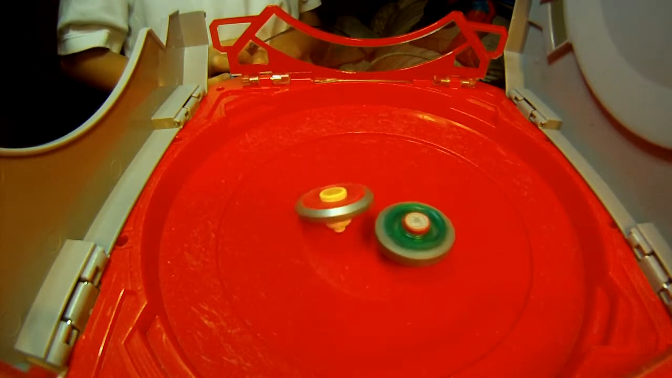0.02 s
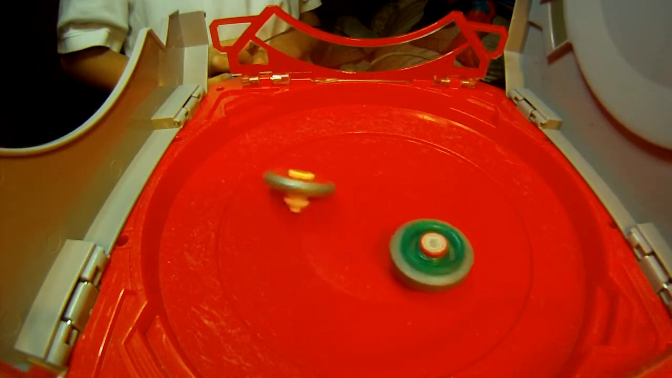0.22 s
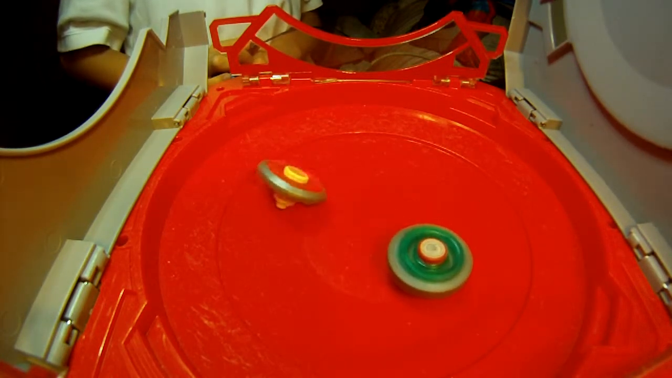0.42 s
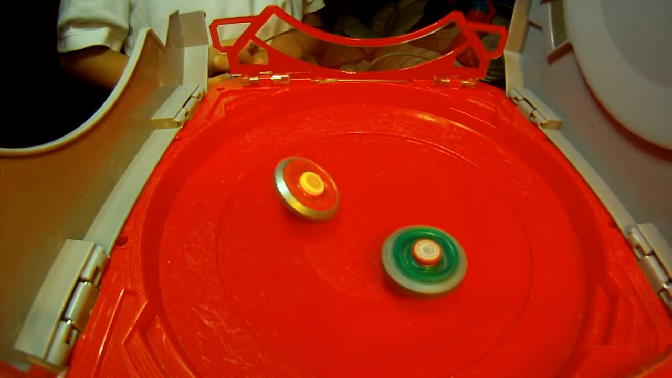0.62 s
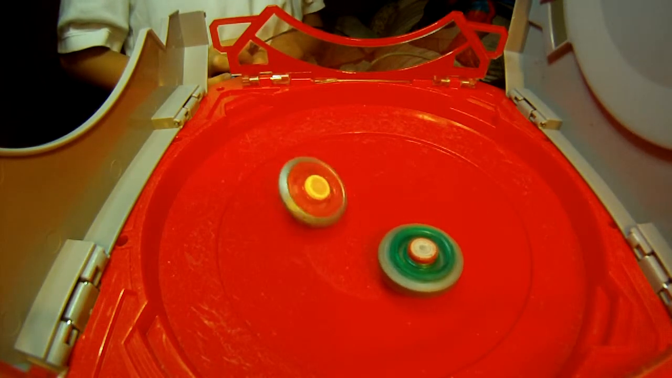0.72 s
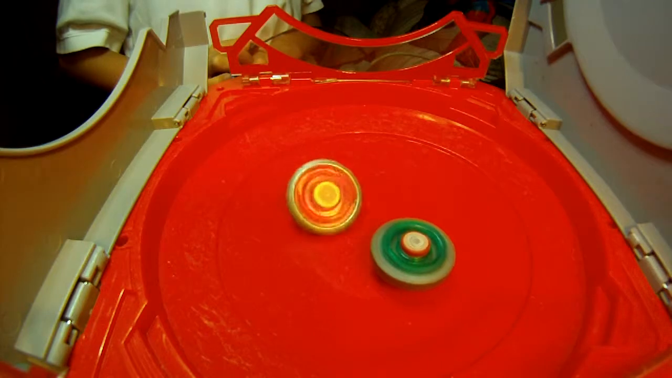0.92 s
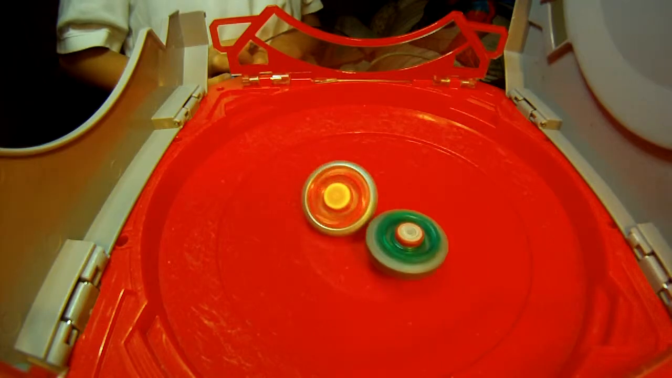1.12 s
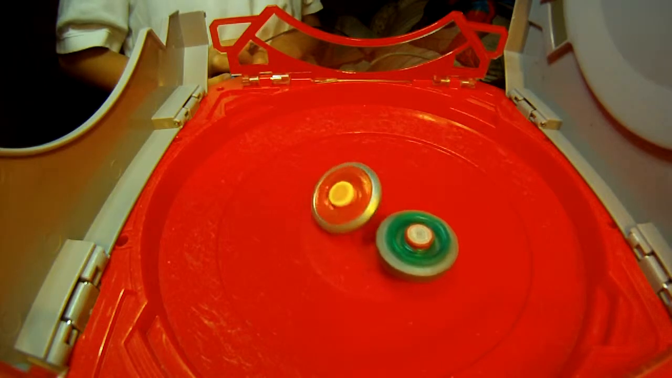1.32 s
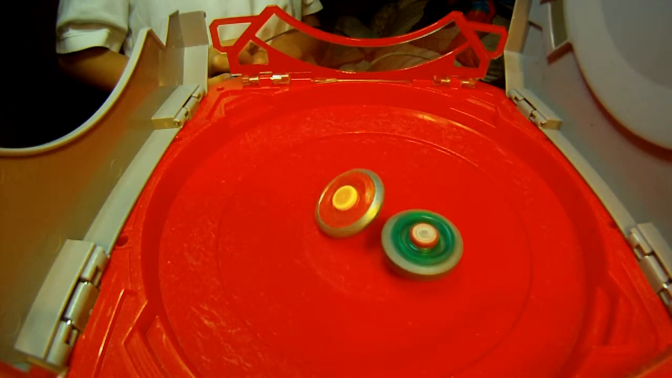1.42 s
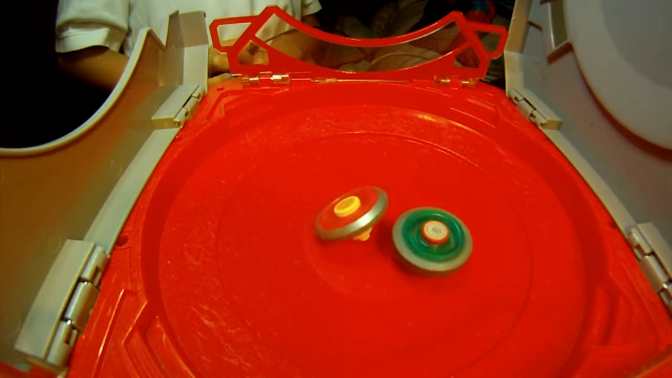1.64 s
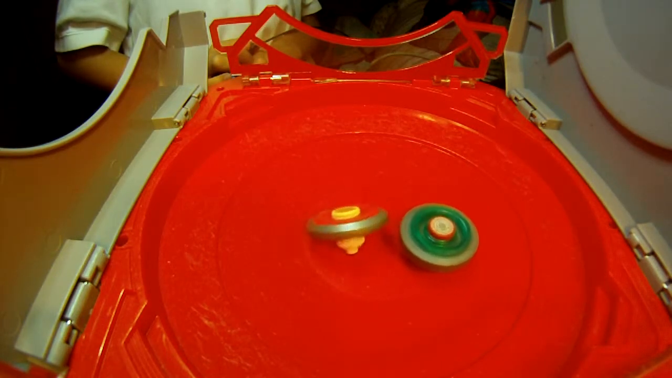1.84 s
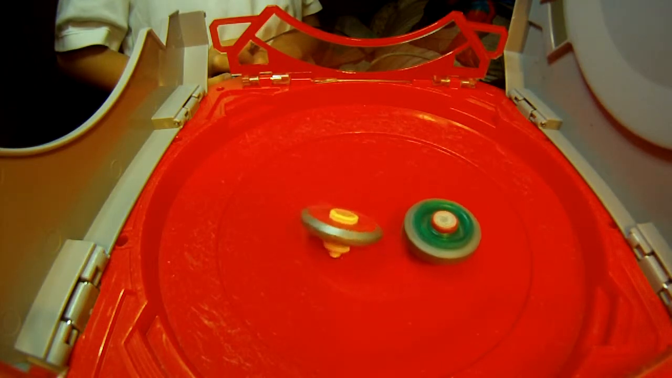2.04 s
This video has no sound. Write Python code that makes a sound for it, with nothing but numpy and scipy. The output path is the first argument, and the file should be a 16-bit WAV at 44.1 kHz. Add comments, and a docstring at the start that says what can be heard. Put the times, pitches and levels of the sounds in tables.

```python
"""A soft hiss and a rubbing hum come first: two metal-wheeled tops spin in a plastic stadium.
Twice their wheels clash brightly, and one top hops over the floor with thumps and clacks until it settles.
The leaning top's tip rubs and knocks once a turn, which makes the floor hum; the other top only hisses.
Noise shaped in colour and level makes the rubs and cracks; fading sine waves make the ringing parts.
A small camera close by overloads on the hardest knock and holds its samples at a low rate: a gritty treble."""
import sys
import numpy as np
from scipy import signal
from scipy.fft import rfft, irfft, next_fast_len
from scipy.io import wavfile

SR = 44100
rng = np.random.default_rng(int(sys.argv[2]) if len(sys.argv) > 2 else 0)


def to_wav(sig):
    """Store sig (one row per channel, or 1-D mono) as 16-bit WAV at the path in sys.argv[1].

    Samples outside -1..1 are clipped; the rate is SR.
    """
    pcm = np.clip(np.atleast_2d(sig), -1, 1) * 32767
    pcm = np.round(pcm).astype(np.int16)
    wavfile.write(sys.argv[1], SR, pcm.T)  # frames by channels


N = 92610  # samples in the scene
T = np.arange(N) / SR  # time [s]
SIZE = next_fast_len(N + SR // 2)  # filter length with spare room [samples]
HZ = np.fft.rfftfreq(SIZE, 1 / SR)  # frequencies of the filters [Hz]
AGE = T[:SR * 3 // 4]  # time since a blow [s]

# How fast the leaning top spins: (time [s], speed [turns/s])
SPIN = [(0, 28.5), (.5, 27.4), (1.2, 27.25), (1.45, 26.85), (2.1, 26.8)]
# The leaning top on the floor: (time [s], hum [dB], rub [dB], once-a-turn tick [dB])
CONTACT = [(0, -64, -50, -86), (.19, -48.5, -48.5, -64), (.27, -45, -55, -62), (.4, -40, -37.5, -72),
           (.5, -42.5, -44.5, -68.5), (.62, -52, -48.5, -78), (.75, -47, -49.5, -60), (.9, -41, -47, -50),
           (1.02, -46.5, -43, -48), (1.1, -38.5, -42.5, -43.5), (1.22, -45, -42.5, -47.5),
           (1.42, -46.5, -53.5, -57), (1.62, -50, -46.5, -58.5), (1.77, -55, -49.5, -43.5),
           (1.9, -51.5, -45.5, -42), (2.1, -50, -43, -53.5)]
# Its distance from the middle of the floor: (time [s], distance [0-1])
OUTWARD = [(0, 0.44), (.2, 0.4), (.4, 0.87), (.65, 0.82), (.9, 0.85), (1.18, 0.58), (1.45, 0.09),
           (2.1, 0.25)]
# Colour of the rub far out and in the middle: (frequency [Hz], level [dB])
RUB_OUT = [(60, -32.5), (150, -22.5), (230, -1), (335, -1), (430, -4.5), (510, -3.5), (580, -17),
           (680, -27.5), (1300, -30.5), (5000, -43.5)]
RUB_MIDDLE = [(60, -15), (130, -3), (290, -13), (400, -0.5), (500, -0.5), (600, 1), (665, -15.5),
              (930, -17), (1400, -28.5), (5000, -54)]
# Colour of a tick, scuff or graze: (frequency [Hz], level [dB])
TICK_COLOUR = [(60, -20), (130, -7), (300, -3), (450, 4), (590, 6), (720, -10), (920, -5), (1300, -13),
               (1800, -27), (3000, -25), (5500, -50)]
# Hiss of the sliding tips: (time [s], level [dB])
SLIDE = [(0, -54), (.5, -56), (.7, -58), (1.2, -58.5), (1.65, -58), (1.8, -52.5), (1.89, -46.5),
         (1.93, -55), (2.1, -56)]
# Colours of the hiss and the quiet room: (frequency [Hz], level [dB])
HISS_COLOUR = [(200, 23.5), (900, 4), (1800, 2), (2500, 6.5), (3200, 6), (3900, -2), (5000, -1.5),
               (5900, -21)]
ROOM_COLOUR = [(20, -13), (60, 0.5), (120, 0), (200, 2.5), (500, -3.5), (1200, -32), (5000, -28.5)]
# Wheel against wheel: (time [s], crack level [dB], ring of the wheels before WHEEL_DB [dB re crack])
CLASHES = [(.198, -23, 1), (0.2136, -14, -0.5), (0.2173, -30, -34), (0.2302, -31, -20), (1.2608, -15, 0.5),
           (1.272, -29, -9)]
# Colour of the crack: (frequency [Hz], level [dB])
CLINK_COLOUR = [(200, -58), (900, -28.5), (1450, -8.5), (1900, -12.5), (2600, -1.5), (3250, 3), (4100, -2),
                (4850, 1.5), (5350, -14.5), (5900, -10)]
# Ringing tones of the steel wheels: (frequency [Hz], level [dB], time to fade by 60 dB [s])
WHEELS = [(2850, 6, 0.13), (2920, -4, 0.24), (2960, 4, 0.29), (3240, 0, .22), (3410, 16.5, 0.017),
          (3866, 5, 0.15), (3980, -9, 0.73), (4350, -15, 0.83), (4320, -10.5, 0.75), (4540, 14, 0.049),
          (5170, 4.5, 0.15), (5700, 2.5, 0.23)]
# A top lands on the floor: (time [s], thump [dB], plastic clack [dB])
LANDINGS = [(0.199, -15, -32), (0.2069, -12.5, -22.5), (0.2145, -16.5, -21), (.218, -8, -20.5),
            (0.2324, -17.5, -55), (0.2426, 1, -27), (0.2706, -12, -26), (.2855, -16, -58),
            (0.2934, -21, -29), (0.2978, -13.5, -27.5), (0.3109, -12, -25), (.3277, -8, -19.5),
            (.336, -17, -27.5), (0.3512, -8, -27), (0.3661, -12.5, -29), (0.3789, -14, -28),
            (.3895, -12.5, -32), (.398, -23, -33), (1.261, -20, -28), (1.271, -11, -14.5),
            (1.277, -24, -26.5), (1.2973, -2.5, -18), (1.31, -17, -61), (1.3238, -12.5, -25.5),
            (1.333, -17, -35), (1.338, -15.5, -52), (1.345, -19.5, -46), (1.576, -27, -49),
            (2.02, -45, -50)]
# Colours of the thump, the clack and the hollow under the floor: (frequency [Hz], level [dB])
THUMP_COLOUR = [(25, -31.5), (70, -27.5), (120, -15.5), (190, -23.5), (290, -8.5), (400, -4.5), (500, 3),
                (590, -2), (720, -26.5), (1000, -41.5), (1500, -37.5), (2200, -73.5), (5000, -78)]
CLACK_COLOUR = [(100, -70), (500, 12), (850, 9.5), (1400, -4), (1900, -3), (2700, 4), (3300, -2),
                (4200, -10.5), (5800, -13)]
BOOM_COLOUR = [(30, -34), (70, -17), (115, 3), (165, -8), (260, -4.5), (400, -14), (1500, -65)]
# Ringing tones of the plastic shell and the stadium: (frequency [Hz], level [dB], time to fade by 60 dB [s])
SHELL = [(1530, -0.5, 0.024), (2970, -3, 0.027), (3730, -6, 0.022)]
STADIUM = [(116.4, -7.5, 0.44), (198, -17.5, 0.64), (250, -20, 0.12), (258.2, -0.5, 0.42),
           (319.4, -16.5, 0.46), (389.7, 1, 0.26), (469.6, 7.5, 0.3), (563, -5.5, 0.39), (589, -10, 0.39),
           (850, -11, 0.24)]
# The top grazes the floor: (time [s], level [dB])
GRAZES = [(1.581, -34), (2.027, -38)]

# Levels in dB, widths and lags in turns, fading times (T60, to fall by 60 dB) in seconds
TICK_AT_S = 1.768  # one whole turn ends here; all other turns are counted from it
HUM_MIDDLE_HZ, HUM_OUT_HZ, HUM_LAG, HUM_WIDTH = 203, 254, 0.5817, 0.22
NOTE_HZ, NOTE_LAG, NOTE_WIDTH, NOTE_DB = 591, 0.029, 0.12, -5  # the floor's higher note
NOTE_SAG_HZ = 190  # how much that note falls far from the middle
DRONE_DB = 2.5  # compared with the rub
TAP_DB, TAP_SCATTER_DB = -2, 1.2
SCUFF_DB, SCUFF_WIDTH = 1, 0.07
ROOM_DB = -57.5
CLINK_T60, CLINK_TAIL_DB, CLINK_TAIL_T60, WHEEL_DB = 0.039, -28, 0.42, -29
CLACK_T60, CLACK_TAIL_DB, CLACK_TAIL_T60 = 0.027, -19, 0.33
THUMP_LAG_S, STADIUM_DB = 0.00081, -27
BOOM_DB, BOOM_T60 = -31.5, 0.4  # level compared with the thump
SHELL_DB, SHELL_GROWS = -20.5, 2.3  # ring at a 0 dB thump; dB of ring for each dB of thump
GRAZE_WIDTH_S = 0.0055
LOW_CUT_HZ, ANTI_ALIAS_HZ, HOLD_HZ, TOP_HZ = 28, 5800, 12000, 15450
CLIP_TOP = 1.0  # largest sample before overload


def amp(db):
    """Turn decibels into a plain multiplier."""
    return 10 ** (np.asarray(db) / 20)


def unit(x):
    """Scale a sound to an average strength (rms) of 1."""
    return x / np.sqrt(np.mean(x ** 2) + 1e-20)


def curves(rows):
    """Draw one value per sample, in straight lines between rows, for each column after the time."""
    times, *columns = np.transpose(rows)
    return [np.interp(T, times, column) for column in columns]


def filtered(x, response):
    """Multiply the spectrum of x by a response on the HZ grid."""
    return irfft(rfft(x, SIZE) * response, SIZE)[:len(x)]


def coloured(x, points):
    """Give x the listed colour with a filter that never acts ahead of the sound."""
    hz, db = np.transpose(points)
    level_db = np.interp(np.log(HZ + 1), np.log(hz), db)
    # Folding the log spectrum's transform onto positive times makes the filter minimum-phase
    cepstrum = irfft(np.log(amp(level_db)), SIZE)
    cepstrum[1:SIZE // 2] *= 2
    cepstrum[SIZE // 2 + 1:] = 0
    return filtered(x, np.exp(rfft(cepstrum)))


def noise(points):
    """Make steady coloured noise with an rms of 1."""
    return unit(coloured(rng.standard_normal(N), points))


def low_pass(hz, order):
    """Make a steep, flat-topped response that removes what lies above hz."""
    return 1 / np.sqrt(1 + (HZ / hz) ** (2 * order))


def fade(t60):
    """A blow's sound dies away exponentially, by 60 dB in t60 seconds."""
    return np.exp(-np.log(1000) * AGE / t60)


def struck(times, dbs, response):
    """Start a copy of the response at each time, with its level."""
    samples = np.round(np.asarray(times) * SR).astype(int)
    blows = np.bincount(samples, amp(dbs), N)
    return signal.fftconvolve(blows, response)[:N]


def ring(modes, scatter_db):
    """A struck body sings in fading tones, whose strengths are drawn a little differently on each call."""
    total = 0
    for hz, db, t60 in modes:
        strength = amp(db + scatter_db * rng.standard_normal())
        total = total + strength * fade(t60) * np.sin(2 * np.pi * hz * AGE)
    return total


def knock(points):
    """A single blow of the given colour, with its largest sample at 1."""
    x = coloured(signal.unit_impulse(len(AGE)), points)
    return x / np.abs(x).max()


def once_a_turn(turns, width):
    """A smooth bump at each whole turn; width in turns."""
    return np.exp(-.5 * (np.sin(np.pi * turns) / (np.pi * width)) ** 2)


def swell(turns, rate, hz, width):
    """A resonance swells and fades once a turn; width in turns."""
    since = turns % 1
    total = 0
    for offset in (since, since - 1):  # after the last whole turn, and ahead of the next
        total = total + np.exp(-.5 * (offset / width) ** 2) * np.cos(2 * np.pi * hz * offset / rate)
    return unit(total)


def worn_tip(turns, rough, size=1500):
    """The tip's unevenness passes again each turn; a rough share is new every time."""
    bumps = rng.standard_normal(size)
    place = (turns % 1 * size).astype(int) % size
    return bumps[place] + rough * rng.standard_normal(N)


def whir():
    """The leaning top hums, rubs and ticks at its spin rate."""
    rate, = curves(SPIN)
    turns = np.cumsum(rate) / SR
    turns -= np.interp(TICK_AT_S, T, turns)
    outward = np.clip(curves(OUTWARD)[0], 0, 1)
    hum_db, rub_db, tick_db = curves(CONTACT)
    humming = amp(hum_db) * hum(turns, rate, outward)
    rubbing = amp(rub_db) * (rub(turns, outward) + drone(turns, outward))
    ticking = amp(tick_db) * ticks(turns, rate, outward)
    return humming + rubbing + ticking


def hum(turns, rate, outward):
    """The unbalanced top pushes the floor once a turn; the floor answers higher towards its stiffer rim."""
    pitch_hz = HUM_MIDDLE_HZ + (HUM_OUT_HZ - HUM_MIDDLE_HZ) * outward
    return swell(turns - HUM_LAG, rate, pitch_hz, HUM_WIDTH)


def rub(turns, outward, swing=0.23):
    """The worn tip rubs on the floor; its colour blends between the middle and far out."""
    drag = worn_tip(turns, rough=0.36) * (1 + swing * np.cos(2 * np.pi * turns))
    far = unit(coloured(drag, RUB_OUT))
    middle = unit(coloured(drag, RUB_MIDDLE))
    return unit(outward * far + (1 - outward) * middle)


def drone(turns, outward, order=22):
    """Towards the middle of the floor one multiple of the spin rate sings on between the ticks."""
    tone = np.cos(2 * np.pi * order * (turns - NOTE_LAG))
    return amp(DRONE_DB) * (1 - outward) ** 1.54 * tone


def ticks(turns, rate, outward):
    """Once a turn the leaning top sounds the floor's note; near the middle it also taps and scuffs."""
    times = T[1:][np.diff(np.floor(turns)) > 0]
    tap_dbs = TAP_SCATTER_DB * rng.standard_normal(len(times))
    taps = unit(struck(times, tap_dbs, knock(TICK_COLOUR)))
    scuff = worn_tip(turns, rough=0.93) * once_a_turn(turns, SCUFF_WIDTH)
    scuff = unit(coloured(scuff, TICK_COLOUR))
    note = swell(turns - NOTE_LAG, rate, NOTE_HZ - NOTE_SAG_HZ * outward ** 3, NOTE_WIDTH)
    touch = amp(TAP_DB) * taps + amp(SCUFF_DB) * scuff
    return amp(NOTE_DB) * note + (1 - outward) ** 3 * touch


def hiss():
    """The tips slide on the plastic over a quiet room."""
    sliding = amp(curves(SLIDE)[0]) * noise(HISS_COLOUR)
    return sliding + amp(ROOM_DB) * noise(ROOM_COLOUR)


def clashes():
    """Steel meets steel: a bright crack, a short wash and the ring of the wheels."""
    times, crack_db, ring_db = np.transpose(CLASHES)
    decay = fade(CLINK_T60) + amp(CLINK_TAIL_DB) * fade(CLINK_TAIL_T60)
    total = noise(CLINK_COLOUR) * struck(times, crack_db, decay)
    for time, db in zip(times, crack_db + ring_db):
        total = total + struck([time], [db + WHEEL_DB], ring(WHEELS, scatter_db=2))
    return total


def landings():
    """Each hop clacks the plastic shell, pushes the thin floor down and leaves the stadium ringing and booming."""
    times, thump_db, clack_db = np.transpose(LANDINGS)
    floor = knock(THUMP_COLOUR) + amp(STADIUM_DB) * ring(STADIUM, scatter_db=4)
    body = -struck(times + THUMP_LAG_S, thump_db, floor)
    shell = 0
    for time, db in zip(times, thump_db):  # hard knocks ring the shell far more than soft ones
        shell = shell + struck([time], [SHELL_DB + SHELL_GROWS * db], ring(SHELL, scatter_db=0.5))
    # Overlapping noises add as power: square the levels and fades, then take the root
    clack_fade = fade(CLACK_T60) + amp(CLACK_TAIL_DB) * fade(CLACK_TAIL_T60)
    clack_power = struck(times, 2 * clack_db, clack_fade ** 2)
    boom_power = struck(times, 2 * (thump_db + BOOM_DB), fade(BOOM_T60) ** 2)
    clack = noise(CLACK_COLOUR) * np.sqrt(np.abs(clack_power))
    boom = noise(BOOM_COLOUR) * np.sqrt(np.abs(boom_power))
    return body + shell + clack + boom


def grazes():
    """The wobbling top drags on the floor for an instant: a short swell of noise."""
    level = sum(amp(db) * np.exp(-.5 * ((T - time) / GRAZE_WIDTH_S) ** 2) for time, db in GRAZES)
    return noise(TICK_COLOUR) * level


def scene():
    """Add all the sounds at one microphone."""
    return (clashes() + landings() + grazes() + whir() + hiss())[None]


def record(dry):
    """The camera thins the bass, clips, then holds each sample, which mirrors the sound around the hold rate."""
    bass_cut = (1j * HZ / (LOW_CUT_HZ + 1j * HZ)) ** 2
    x = filtered(dry[0], bass_cut * low_pass(HOLD_HZ / 2, order=16))
    clipped = np.clip(x, -CLIP_TOP, CLIP_TOP)
    x = filtered(clipped, low_pass(ANTI_ALIAS_HZ, order=30))
    mirrored = x * (1 + 2 * np.cos(2 * np.pi * HOLD_HZ * T))
    # Holding each sample softens the treble by a sinc curve
    return filtered(mirrored, np.sinc(HZ / HOLD_HZ) * low_pass(TOP_HZ, order=70))[None]


dry = scene()
out = record(dry)
to_wav(out)
```